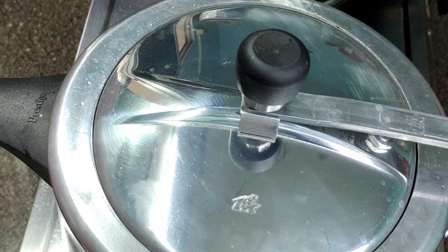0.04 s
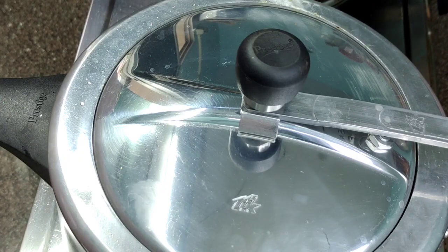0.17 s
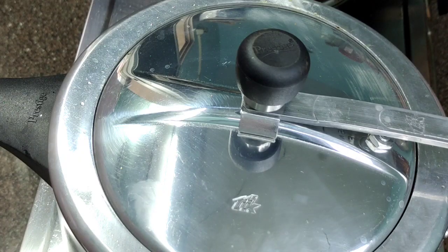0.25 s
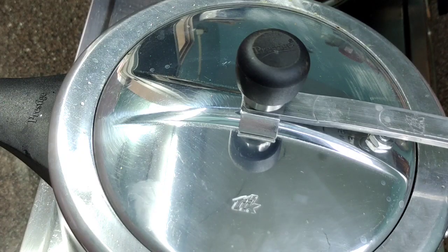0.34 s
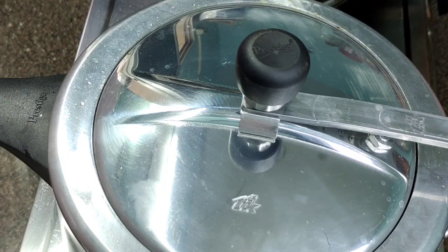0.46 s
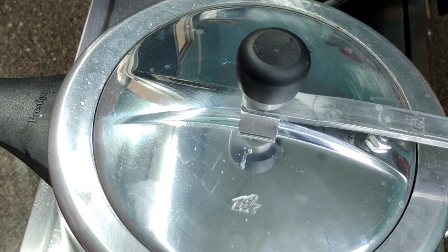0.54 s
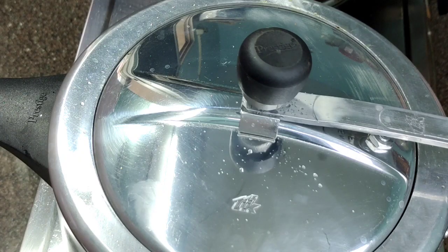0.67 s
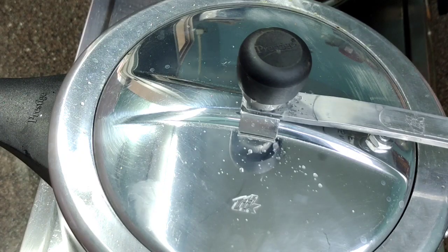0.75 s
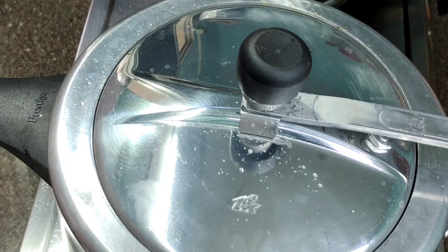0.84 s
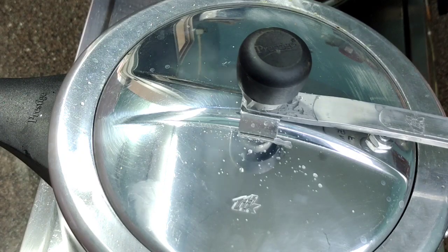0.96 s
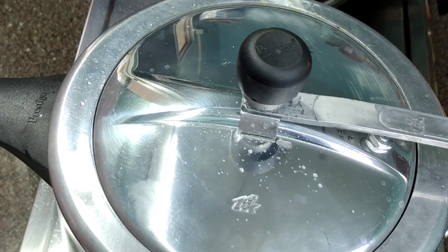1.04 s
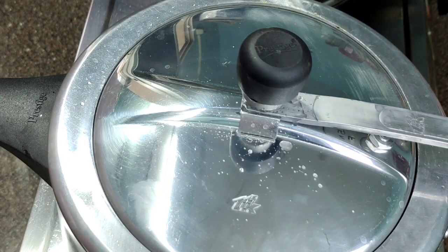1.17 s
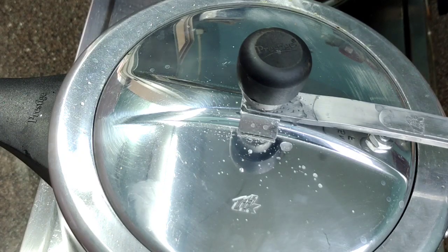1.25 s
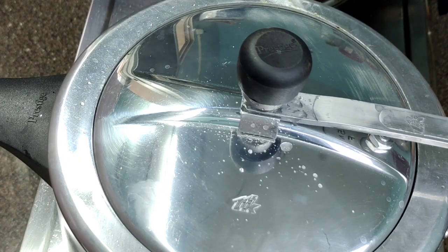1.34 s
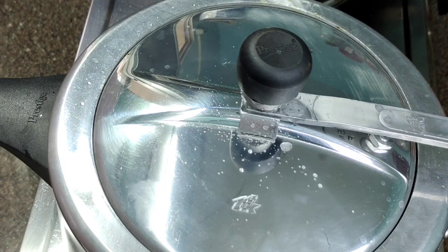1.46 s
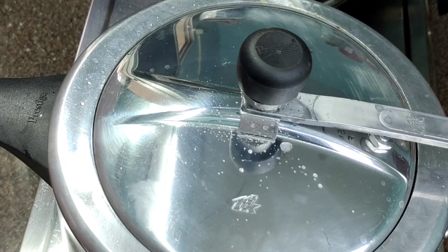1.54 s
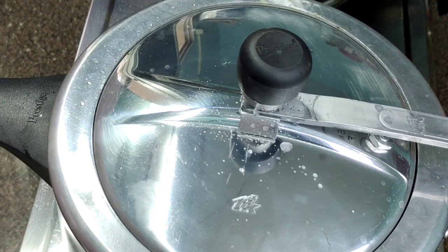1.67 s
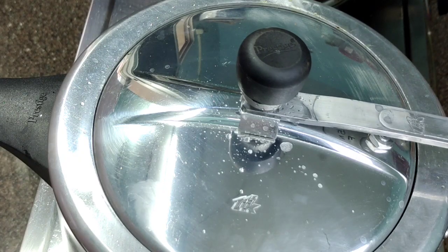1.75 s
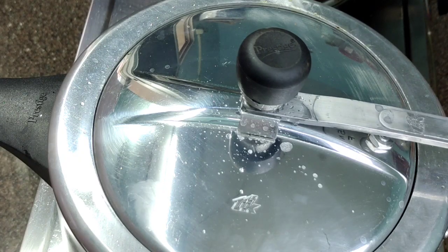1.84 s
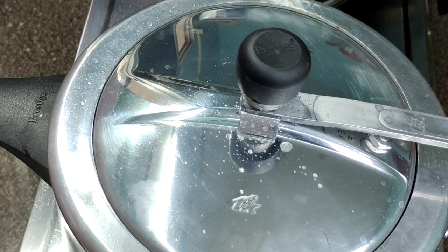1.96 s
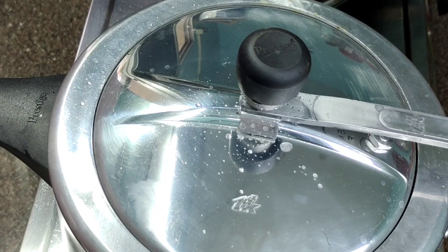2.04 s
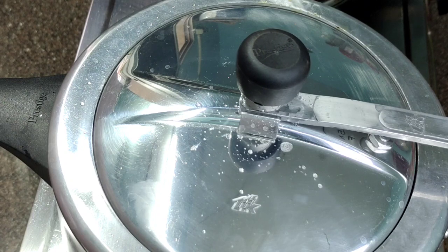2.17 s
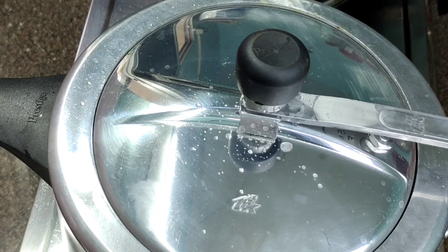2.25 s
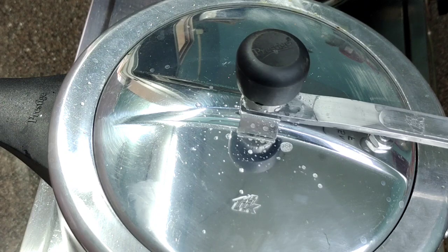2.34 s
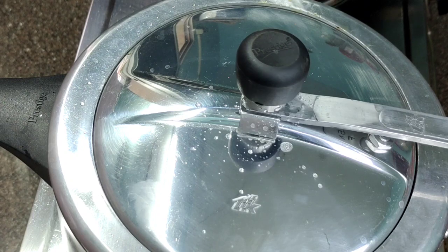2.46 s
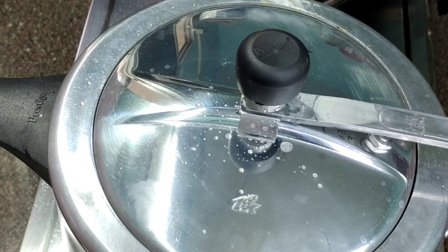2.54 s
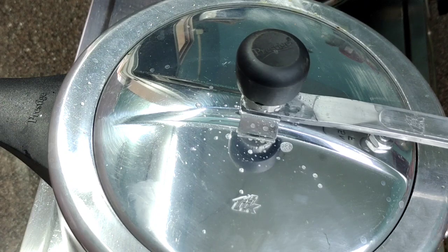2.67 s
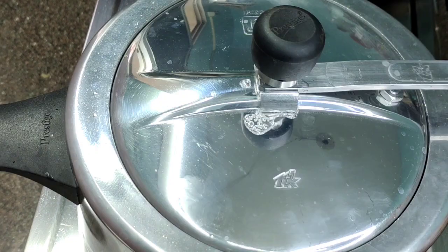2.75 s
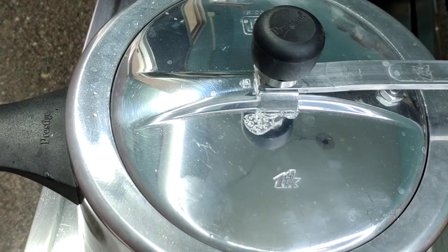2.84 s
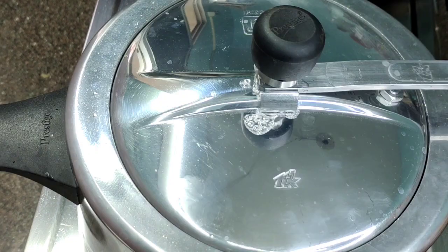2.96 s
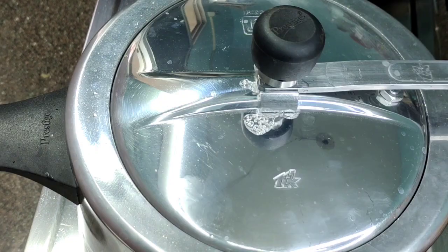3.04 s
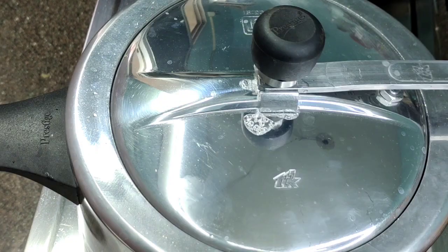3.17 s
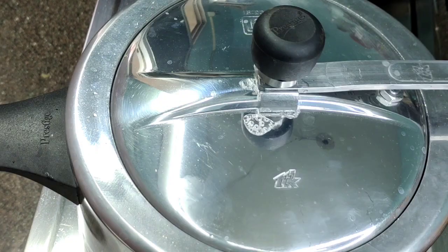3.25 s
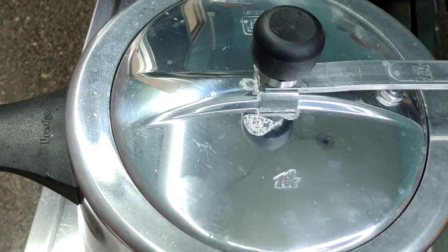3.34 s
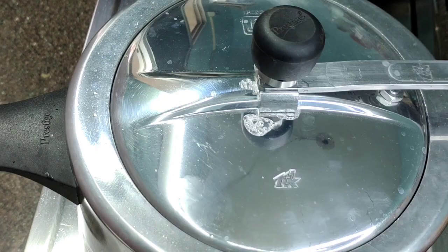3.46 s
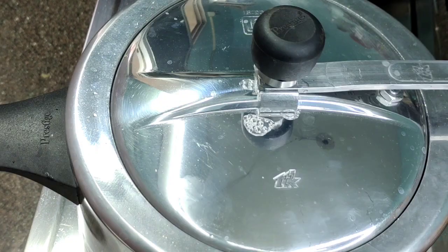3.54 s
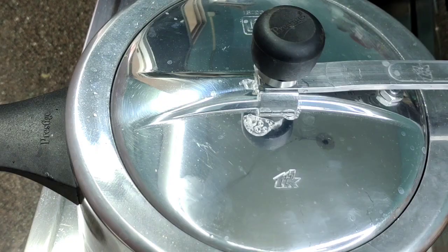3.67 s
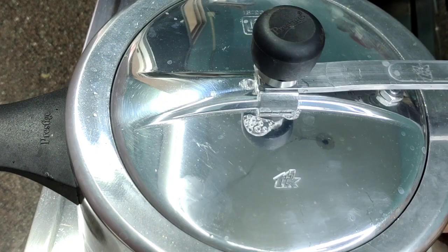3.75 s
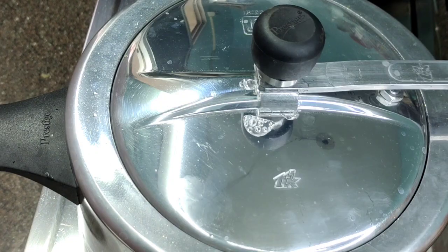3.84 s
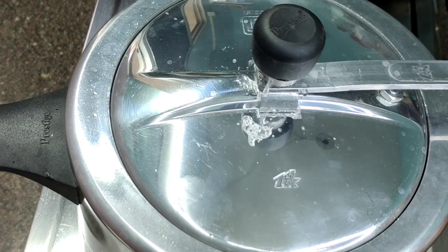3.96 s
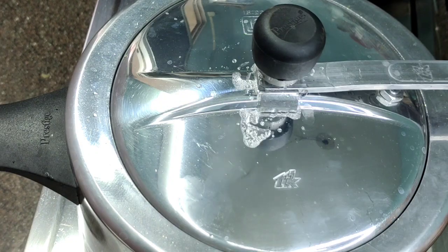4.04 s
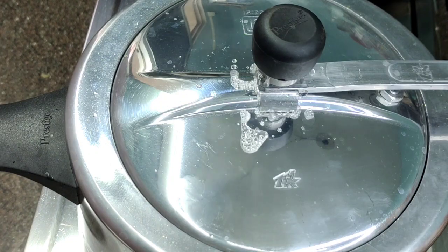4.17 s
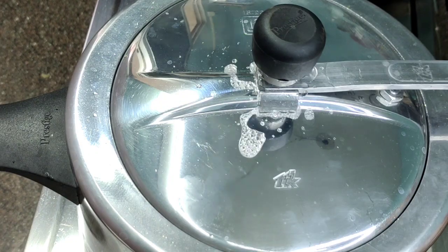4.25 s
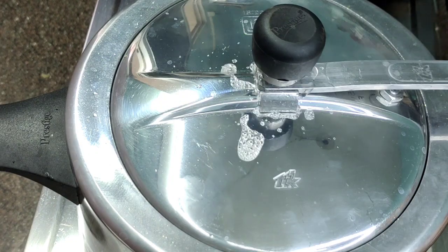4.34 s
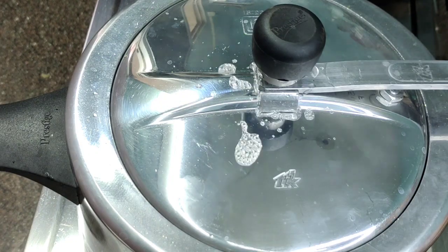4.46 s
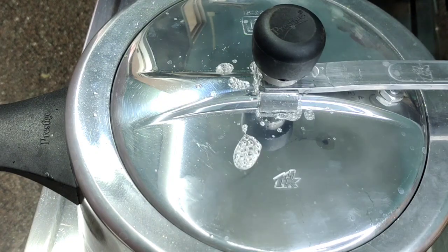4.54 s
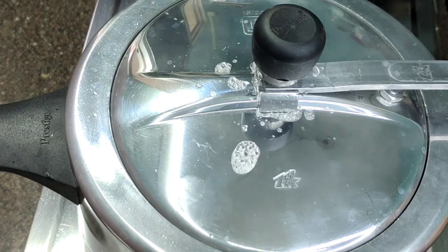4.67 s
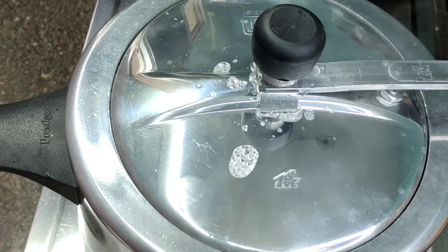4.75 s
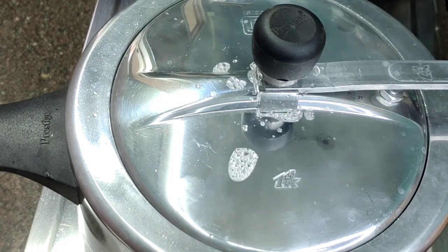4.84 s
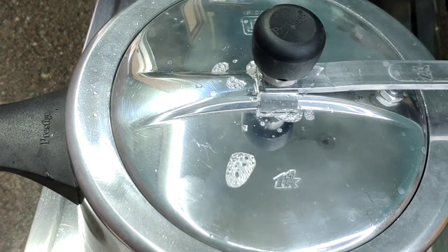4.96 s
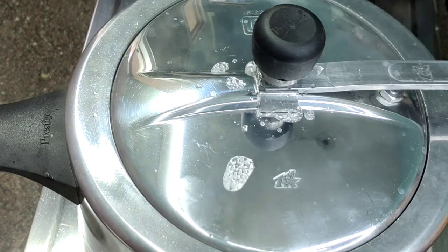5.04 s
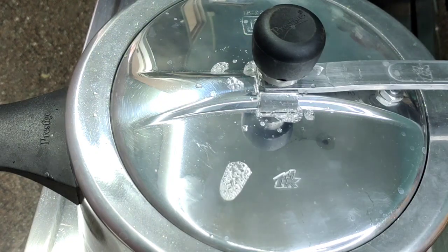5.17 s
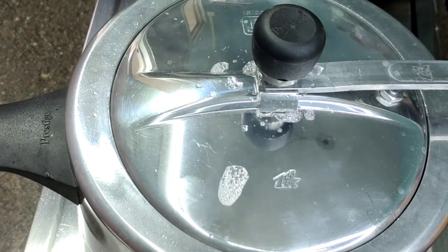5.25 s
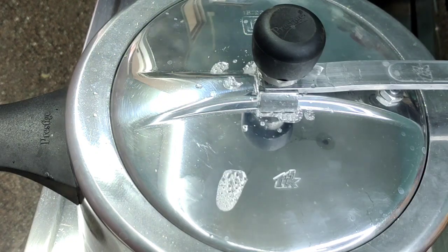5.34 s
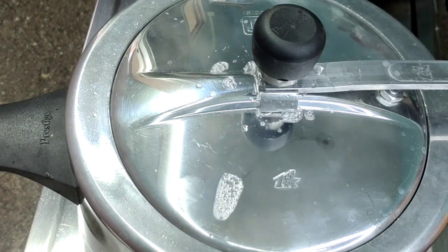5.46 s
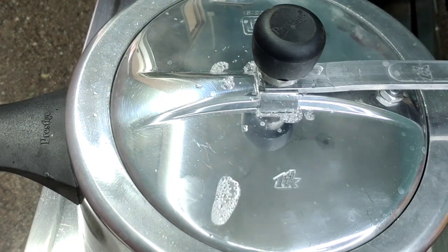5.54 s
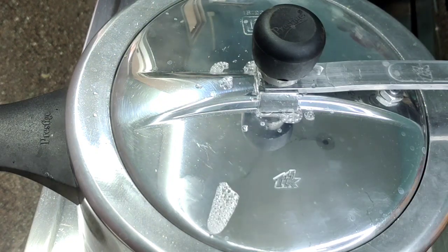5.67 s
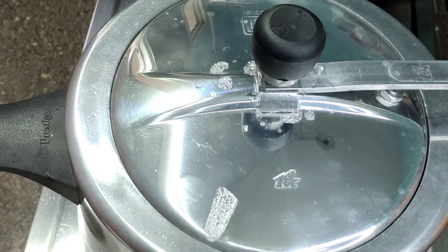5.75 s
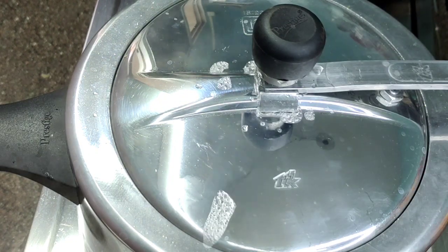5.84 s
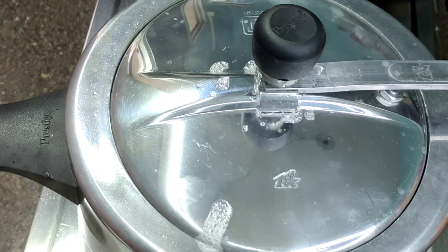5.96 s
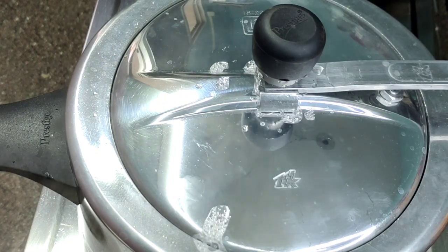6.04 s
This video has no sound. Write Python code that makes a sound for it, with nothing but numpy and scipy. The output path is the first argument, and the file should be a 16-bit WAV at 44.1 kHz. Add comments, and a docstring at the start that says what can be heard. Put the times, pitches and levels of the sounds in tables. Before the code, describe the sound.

A pressure cooker is heard very close above its lid, in stereo, in a small kitchen with a short echo. At first there is only soft stove murmur, a faint wavering low hum and a thin seep of steam. At about 0.36 seconds a wet spit cracks out and fades, and by 0.6 a loud steam jet bursts in, hissing and sizzling brightly with droplets crackling and a rougher roar surging at its start. It eases slightly, dips near 1.8, then cuts off at 2.2 as the weight drops with a hard clack and two smaller rattles. Quiet murmur follows, with tiny tinks at 2.7 and 3.1 and a faint leak swelling from about 2.9. At 3.77 the pot gives a dull ringing thump with a slight spit, and by 3.9 a second dense, steady jet is roaring, continuing to the end at around 6 seconds.

```python
"""A faint hum and a thin seep of steam swell into a wet spit, then a pressure cooker jets, heard close above its lid.
The weight clacks shut; faint tinks, a pot thump and a second jet follow, in a small kitchen over the stove's murmur.
Steam is turbulent noise, coloured by the vent and gated by the weight; struck metal is a sum of damped modes.
The hum is low tones of wavering pitch and level, the murmur soft stereo noise; dense decaying noise makes the echoes."""
import sys
import numpy as np
from scipy import signal
from scipy.fft import rfft, irfft, next_fast_len
from scipy.io import wavfile
from scipy.ndimage import uniform_filter1d

SR = 44100
rng = np.random.default_rng(int(sys.argv[2]) if len(sys.argv) > 2 else 0)


def invert_db(level):
    """Linear amplitude ratio for a level in decibels (20 dB per decade), elementwise."""
    return 10 ** (np.asarray(level, dtype=float) / 20)


def dump(signal):
    """Clip the signal to [-1, 1] and save it as 16-bit WAV at the path in sys.argv[1]."""
    limited = np.clip(np.atleast_2d(signal).T, -1, 1)
    pcm = np.round(limited * 32767).astype(np.int16)
    wavfile.write(sys.argv[1], SR, pcm)


N = 269274
M = next_fast_len(N)  # transform length
T = np.arange(N) / SR  # time axis [s]
F = np.arange(M // 2 + 1) * SR / M  # frequency axis [Hz]

# bursts of steam: (weight fully lifted [s], weight shuts [s], hiss level [dB], hiss sag [dB/s],
# sizzle level [dB], sizzle lead [s], roar level [dB])
BURSTS = [(0.624, 2.206, -23, 2.5, -19, 0.068, -39.5), (3.921, 7, -24.5, .5, -19.5, .0, -37.5)]
# spectrum of each burst, shaped by vent pipe and cap: (frequency [Hz], density [dB per Hz])
JET_COLOURS = [
    [(1180, -46), (2000, -27), (2230, -19), (2600, -3), (2920, -4.5), (3580, 1.5), (5270, -8),
     (5790, -17.5), (6460, -4.5), (7020, -1), (8040, -6), (10100, -11), (11300, -5.5), (12600, -8),
     (15000, -3)],
    [(1180, -70), (2000, -16.5), (2290, -20), (2490, 0.5), (2660, -1), (3000, -0.5), (3730, 2.5),
     (5230, -4), (5690, -11), (7330, 3.5), (10600, -9), (13000, -5.5), (15000, -3)],
]
# spectrum of the lower roar: (frequency [Hz], density [dB per Hz])
ROAR_COLOUR = [(200, -3.5), (400, -5), (800, -2), (1400, -1), (1900, 3.5), (2400, 0.5), (3000, -15)]
# wet spits as the weight cracks open: (peak [s], level [dB], rise [dB/s], fall [dB/s])
SPITS = [(.361, -24.5, 1800, 67), (3.775, -44, 1800, 75)]
# spectrum of the spits: (frequency [Hz], density [dB per Hz])
SPIT_COLOUR = [(290, -24), (600, 0.5), (1000, -6), (1530, -10.5), (1980, -1.5), (3550, -8.5), (4220, -9),
               (5160, -16), (6500, -9), (8400, -7), (8850, 7.5), (9300, -7), (11250, 0.5), (12000, -4),
               (15000, -14)]
# seep around the closed weight, growing with pressure:
# (full [s], ends [s], level [dB], rise [dB/s], fall [dB/s])
SEEPS = [(.35, .36, -45, 85, 180), (2.95, 3.746, -55.5, 42, 100), (3.07, 3.08, -60, 82, 57)]
# spectrum of the seep: (frequency [Hz], density [dB per Hz])
SEEP_COLOUR = [(1290, -23), (2200, -2), (2650, 1), (2940, -2.5), (3310, 0.5), (5540, -10), (7110, 1),
               (7640, -4.5), (10800, -3.5), (11700, -6), (15000, -2.5)]
# knocks of the weight shutting: (time [s], level [dB], contact [ms])
WEIGHT_KNOCKS = [(2.228, -18, 0.32), (2.249, -26.5, .3), (2.268, -31, 0.61)]
# ringing modes of the weight: (frequency [Hz], level [dB], decay by 60 dB [s])
WEIGHT_MODES = [(700, -10, .02), (797, -7, .09), (850, -16, .25), (1028, 0, .075), (1200, -6, .02),
                (1620, -16, .06), (2000, -18, .04)]
# thump of the pot: (time [s], level [dB], contact [ms])
POT_KNOCKS = [(3.769, -16, 1.3)]
# ringing modes of the pot: (frequency [Hz], level [dB], decay by 60 dB [s])
POT_MODES = [(110.7, -15, 0.87), (223.5, -15, 0.39), (308, -6, 0.51), (326.5, -0.5, 0.33), (425, -16, 0.45),
             (470, -12, 0.46), (637, -15.5, 0.54), (800, -14, .15), (1400, -22, .1), (3000, -29, .1)]
# faint tinks: (time [s], level [dB], contact [ms])
TINKS = [(2.72, -49, .15), (3.06, -45, .1)]
# ringing modes of the tinks: (frequency [Hz], level [dB], decay by 60 dB [s])
TINK_MODES = [(1472, -0.5, 0.19), (2900, 0, .03), (4200, -2, .02)]
# low tones: (frequency [Hz], waver [Hz], level [dB])
HUM = [(100.5, 3.64, -50.5), (201.7, 7.95, -58)]
# spectrum of the murmur: (frequency [Hz], density [dB per Hz])
MURMUR_COLOUR = [(18, -45), (30, -25), (70, -14), (105, -3), (140, -6), (250, -8), (360, -9), (470, -7),
                 (620, -13.5), (800, -15.5), (1100, -17), (1900, -21), (3000, -29), (5300, -35.5),
                 (15000, -37)]
# left-right correlation of the murmur: (frequency [Hz], likeness [0-1])
MURMUR_ALIKE = [(30, .5), (60, 0.8), (105, 0.88), (160, 0.86), (300, .9), (500, 0.98), (1000, 0.62),
                (2000, .5), (3500, 0.24)]
# response of a phone's two ports: (frequency [Hz], left minus right [dB])
PORTS = [(300, 0), (2500, 1), (3600, 2.5), (4500, 1), (6200, -1.5), (7200, 7.5), (8700, -7.5), (10000, 1.5),
         (12500, 0), (15000, 9)]

OUTLETS, NOTCH_HZ = 4, 5700  # steam outlets; hiss lies below the notch, sizzle above it
LIFT_DB_PER_S, LIFT_KNEE_DB = 190, 4.5  # how fast the jet grows, and how round its arrival
JET_AFTER_SPIT_DB_PER_S = 1500  # extra fall, back in time from the spit: the seat is sealed
ROAR_LEAD_S, ROAR_SURGE_DB, ROAR_SURGE_S = 0.027, 8.5, 0.096  # the roar overshoots as the weight moves
SIZZLE_SAG_SHARE, ROAR_SAG_SHARE = 0.27, 0.32  # of the hiss sag
SINK_S, SINK_DIP_DB, SINK_DIP_S = 0.44, -2, 0.1  # the weight sinks this long before it shuts: the jet dips,
SINK_HISS_DB, SINK_SIZZLE_DB, SINK_ROAR_DB = 0, 1.5, 2.5  # then sizzle and roar sound stronger
SHUT_DB, SHUT_DB_PER_S = -5, 141  # step at the shut, then trapped steam dies away
SIZZLE_SHUT_SHARE = 1.04  # the sizzle dies faster
SEEP_REST_DB, MURMUR_DB = -72, -44.5
ROOM_T60_S, ROOM_DB = 0.25, 8  # kitchen echo; level relative to the direct sound
LID_T60_S, LID_DB = 0.03, -11  # quick reflections off lid, hob and tiles


def jets(hiss):
    """Source-filter principle: vent hiss, sizzle above it and a surging roar each get a spectrum and a gain."""
    upper = 1 / (1 + (NOTCH_HZ / (F + 1)) ** 24)
    roar = colour(hiss, ROAR_COLOUR)
    out = 0
    for (crack, *_), burst, tone in zip(SPITS, BURSTS, JET_COLOURS):
        full, shut, hiss_db, sag, sizzle_db, lead, roar_db = burst
        since_roar = np.clip(T - full + ROAR_LEAD_S, 0, 9)
        surge = invert_db(ROAR_SURGE_DB * np.exp(-(since_roar / ROAR_SURGE_S) ** 2))
        hiss_gain = valve(crack, full, shut, hiss_db, sag, SINK_HISS_DB)
        sizzle_gain = valve(crack, full - lead, shut, sizzle_db, sag * SIZZLE_SAG_SHARE,
                            SINK_SIZZLE_DB, SIZZLE_SHUT_SHARE)
        roar_gain = valve(crack, full - ROAR_LEAD_S, shut, roar_db, sag * ROAR_SAG_SHARE, SINK_ROAR_DB) * surge
        out = out + hiss_gain * colour(hiss, tone, 1 - upper)
        out = out + sizzle_gain * colour(hiss, tone, upper)
        out = out + roar_gain * roar
    return out


def valve(crack, full, shut, db, sag, sink_db, shut_share=1):
    """Flow through a valve sets the gain of a jet layer: lift, sag with the pressure, sink, shut."""
    lift = -LIFT_KNEE_DB * np.logaddexp(0, LIFT_DB_PER_S * (full - T) / LIFT_KNEE_DB)
    lift = lift - JET_AFTER_SPIT_DB_PER_S * np.clip(crack - T, 0, 9)
    sunk = (T - shut + SINK_S) / SINK_DIP_S
    dip = SINK_DIP_DB * np.exp(-sunk ** 2)
    sink = dip + sink_db * (1 + np.tanh(sunk)) / 2
    closed = (T > shut) * (SHUT_DB - shut_share * SHUT_DB_PER_S * (T - shut))
    sagged = sag * np.clip(T - full, 0, shut - full)
    return invert_db(db + lift - sagged + sink + closed)


def steam(surge_db, flicker_db, drops_per_s, drop_db):
    """Turbulence is broadband noise: it surges as a whole, flickers by octaves, and droplets crackle in it."""
    falls = rng.random((OUTLETS, N)) < drops_per_s / SR
    drops = falls * invert_db(drop_db + 2.7 * rng.standard_normal((OUTLETS, N)))
    crackle = uniform_filter1d(drops, size=40) * 40  # each drop lasts 40 samples
    white = rfft(rng.standard_normal((OUTLETS, N)) * (1 + crackle), M)
    out = 0
    for octave in range(8, 15):
        # overlapping cosine-squared octaves add up to one
        band = np.cos(np.pi / 2 * np.clip(np.log2(F + 1) - octave, -1, 1)) ** 2
        out = out + irfft(white * band, M)[:, :N] * invert_db(flicker_db * walk(18))
    return out * invert_db(surge_db * walk(8.9))


def spit(hiss):
    """Sudden release: the first outlet's noise leaps up and decays exponentially as the weight cracks open."""
    gain = sum(swell(peak, peak, db, rise, fall) for peak, db, rise, fall in SPITS)
    return gain * colour(hiss[0], SPIT_COLOUR)


def seep(hiss):
    """Leakage noise: a thin flow around the closed weight grows with pressure above a faint rest level."""
    gain = invert_db(SEEP_REST_DB) + sum(swell(*row) for row in SEEPS)
    return gain * colour(hiss, SEEP_COLOUR)


def knocks(events, modes, rattle_db, rattle_t60):
    """Modal superposition: a push sets off damped modes and a loose rattle; long contact feeds the highs less."""
    out = np.zeros(N)
    below, above = (modes[0][0] / 2, -40), (2 * modes[-1][0], -40)
    rattle_colour = [below] + [m[:2] for m in modes] + [above]
    rattle = colour(rng.standard_normal(N), rattle_colour)
    for s, db, contact_ms in events:
        t = np.clip(T - s, 0, 1)
        onset = np.clip(t / 0.0082, 0, 1)
        out += onset * invert_db(db + rattle_db - 60 * t / rattle_t60) * rattle
        for k, (hz, mode_db, t60) in enumerate(modes):
            soft = np.exp(-(hz * contact_ms / 1000) ** 2)
            sign = (-1) ** k  # neighbours swing in opposite senses, so close pairs swell and beat
            out += sign * soft * invert_db(db + mode_db - 60 * t / t60) * np.sin(2 * np.pi * hz * t)
    return out


def hum():
    """Frequency and amplitude modulation: phase is the running sum of a wavering pitch; the level wavers too."""
    out = 0
    for hz, waver_hz, db in HUM:
        phase = 2 * np.pi * np.cumsum(hz + waver_hz * walk(14)) / SR
        out = out + invert_db(db + 4.0 * walk(8.3)) * np.sin(phase) * np.sqrt(2)
    return out


def murmur():
    """Partial coherence: burner, pot and house as soft noise whose mid and side set the left-right likeness."""
    alike = np.clip(on_freq(MURMUR_ALIKE), 0, 1)
    mid, side = (rfft(rng.standard_normal(M)) for _ in range(2))
    spectra = mid * np.sqrt(1 + alike) + side * np.sqrt(1 - alike) * np.array([[1], [-1]])
    pair = irfft(spectra, M)[:, :N]
    swell_db = 1.1 * walk(5)
    return invert_db(MURMUR_DB + swell_db) * colour(pair, MURMUR_COLOUR)


def room(x, wet_db, t60=ROOM_T60_S):
    """Reverberation is convolution: direct sound plus a dense decaying echo per port; the treble dies sooner."""
    t = T[:SR // 2]
    noise = rng.standard_normal((2, len(t))) * np.clip(t / 0.002, 0, 1)
    low = uniform_filter1d(noise, size=4)
    tail = low * invert_db(-60 * t / t60) + (noise - low) * invert_db(-60 * t / (0.86 * t60))
    reply = invert_db(wet_db) * tail / np.sqrt(np.sum(tail ** 2, axis=1, keepdims=True))
    reply[0, 1] += 1  # direct sound, one sample later on the left
    reply[1, 0] += 1
    wet = signal.fftconvolve(np.atleast_2d(x), reply, axes=1)[:, :N]
    return wet / np.sqrt(1 + invert_db(2 * wet_db))


def swell(full, end, db, rise, fall):
    """Exponential growth and decay: a gain that climbs in dB until full, holds until end, then falls."""
    return invert_db(db - rise * np.clip(full - T, 0, 9) - fall * np.clip(T - end, 0, 9))


def walk(rate):
    """Slow random modulation: levels held 1 / rate s and slewed twice; spread near 1."""
    k = max(int(SR / rate), 1)
    held = np.repeat(rng.standard_normal(N // k + 1), k)
    return 1.3 * uniform_filter1d(uniform_filter1d(held, k), k)[:N]


def on_freq(points):
    """Spectral interpolation: a (frequency [Hz], value) table read at every frequency on a log scale."""
    hz, value = np.transpose(points)
    return np.interp(np.log(F + 1), np.log(hz), value)


def colour(x, points, share=1):
    """Linear filtering: the spectrum is multiplied by a dB curve, or a share of it, then set to unit rms."""
    y = irfft(rfft(x, M) * invert_db(on_freq(points)) * share, M)[..., :N]
    return y / np.sqrt(np.mean(y ** 2))


def scene():
    """Superposition: each outlet meets the room from its own spot; the metal is mostly heard direct."""
    hiss = steam(surge_db=0.27, flicker_db=0.65, drops_per_s=150, drop_db=-2.2)
    outlets = jets(hiss) + seep(hiss)
    vented = sum(room(outlet, ROOM_DB) for outlet in outlets) / np.sqrt(OUTLETS / 2)
    vented = room(vented + room(spit(hiss), -0.4), LID_DB, LID_T60_S)
    clack = knocks(WEIGHT_KNOCKS, WEIGHT_MODES, -19, 0.55)
    thump = knocks(POT_KNOCKS, POT_MODES, -12, 0.74)
    tinks = knocks(TINKS, TINK_MODES, -15, 0.1)
    metal = room(clack + thump + tinks, -14)
    return vented + metal + hum() + murmur()


def band_limit(x):
    """A steep low-pass at the top of the band."""
    return signal.sosfilt(signal.butter(12, 16810, fs=SR, output="sos"), x)


def record(dry):
    """Receiver response: each port colours its side by half their difference, and the top is cut."""
    tilt_db = on_freq(PORTS) / 2
    top_cut = np.clip((15530 - F) / 100, 0, 1)  # silent from 15530 Hz up
    ports = invert_db(np.array([tilt_db, -tilt_db])) * top_cut
    finished = irfft(rfft(dry, M) * ports, M)[:, :N]
    return band_limit(finished)


dry = scene()
out = record(dry)
dump(out)
```